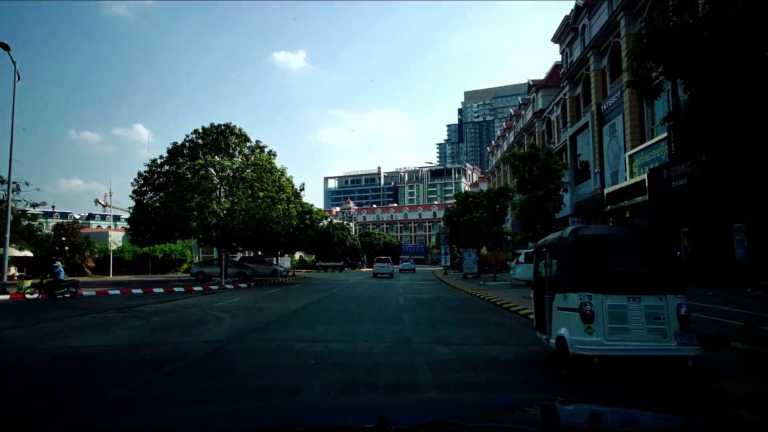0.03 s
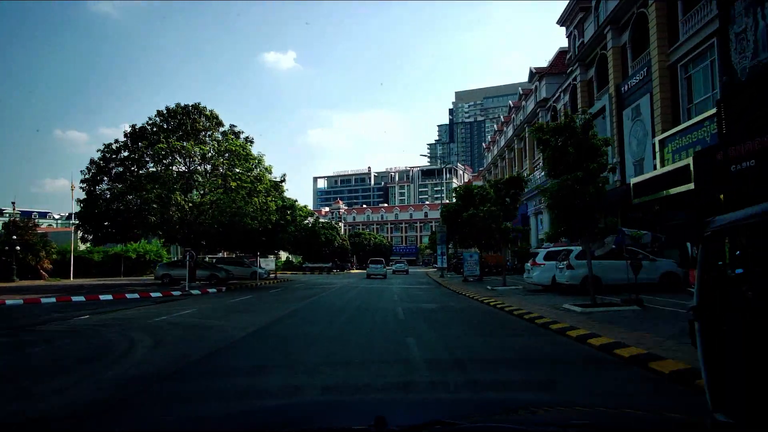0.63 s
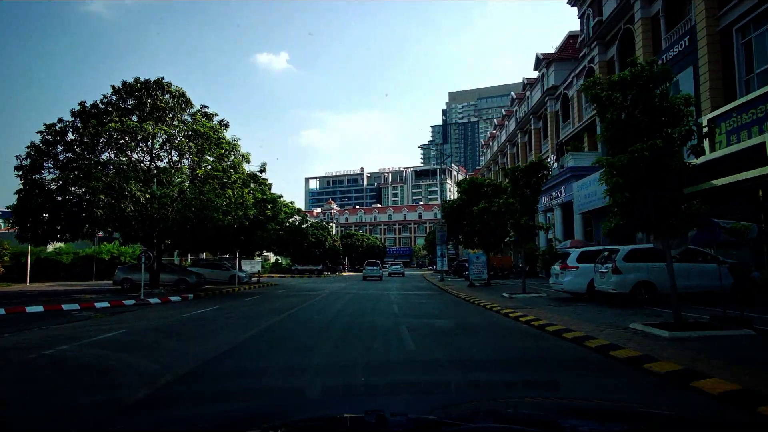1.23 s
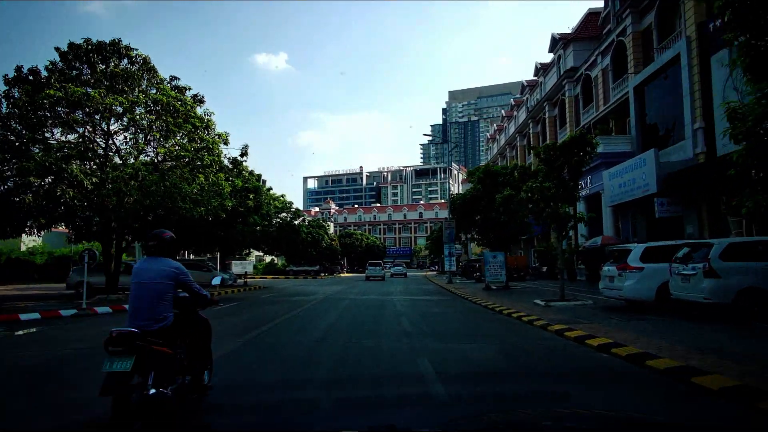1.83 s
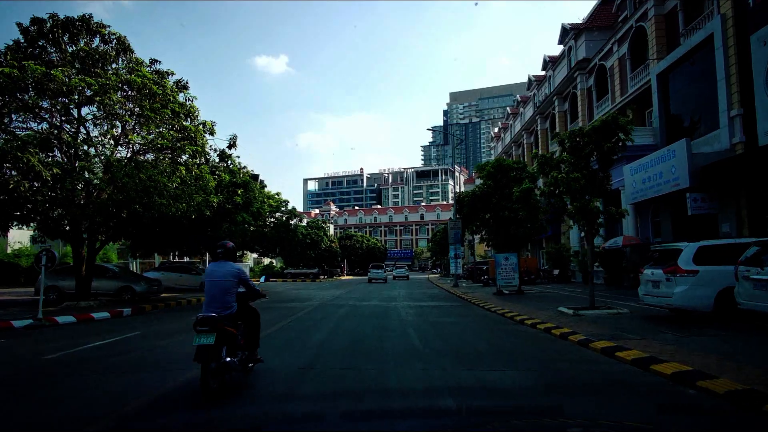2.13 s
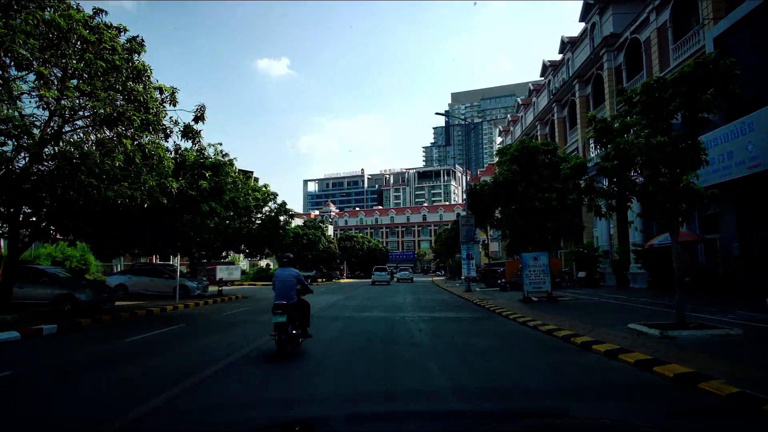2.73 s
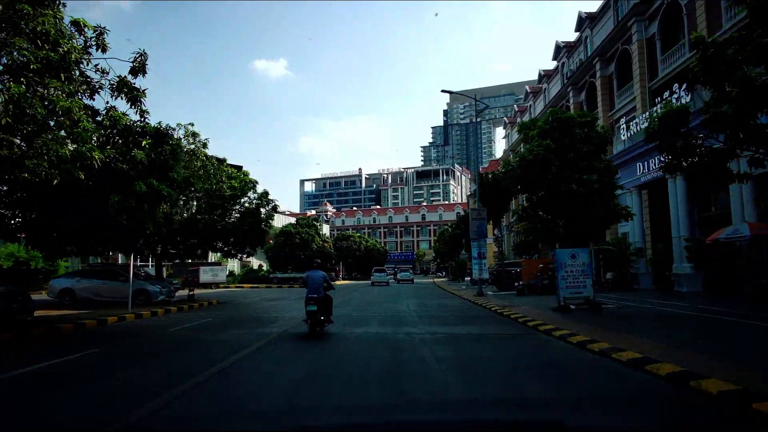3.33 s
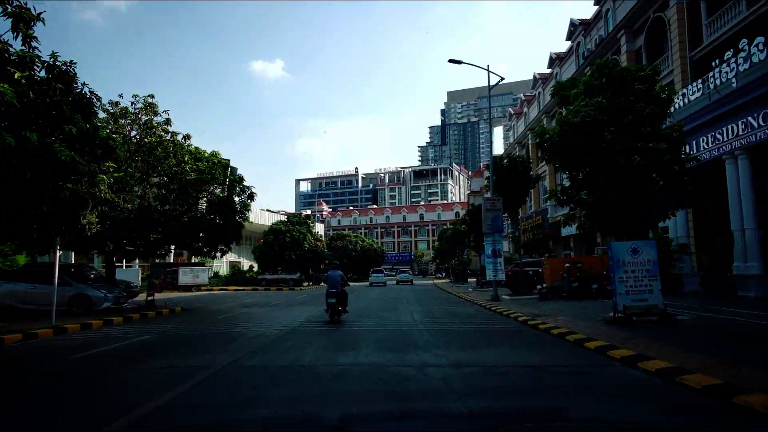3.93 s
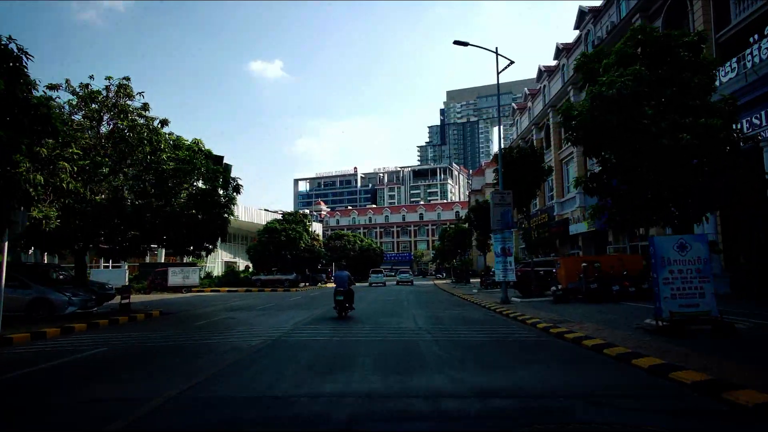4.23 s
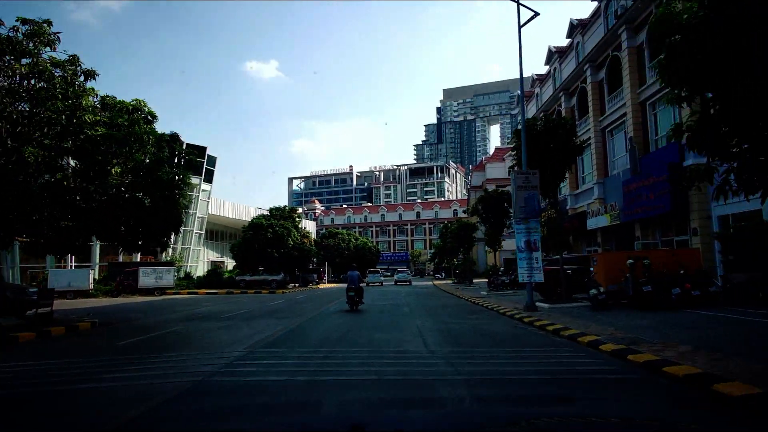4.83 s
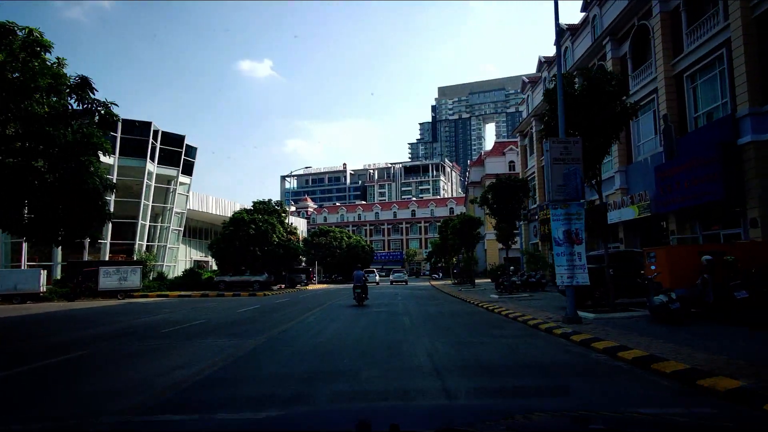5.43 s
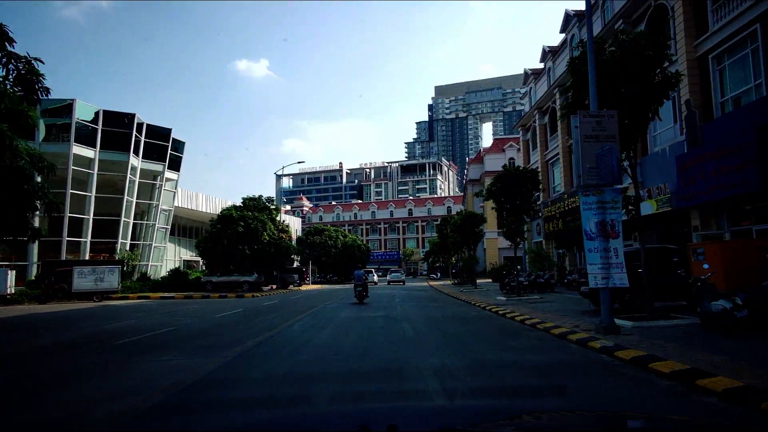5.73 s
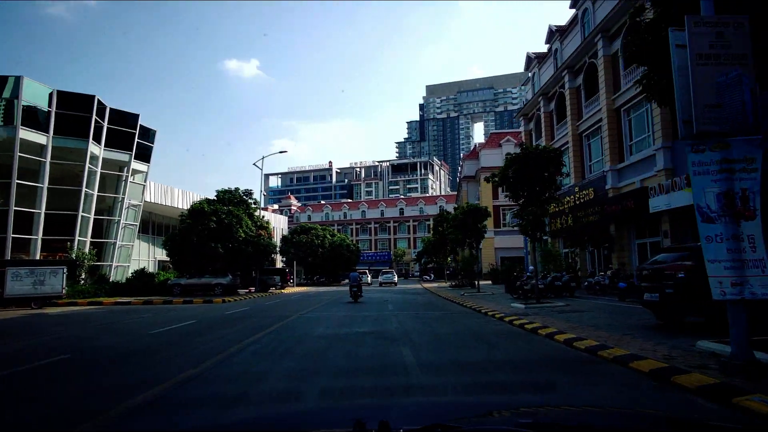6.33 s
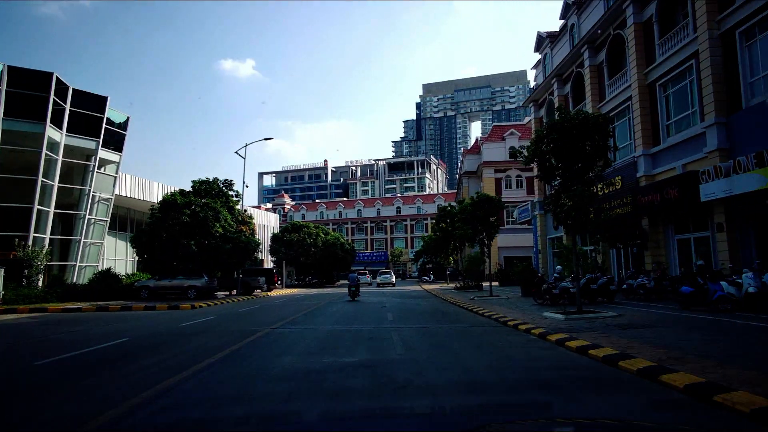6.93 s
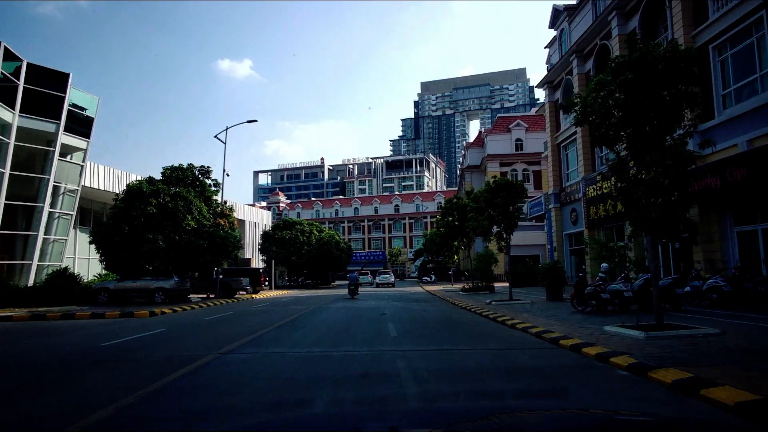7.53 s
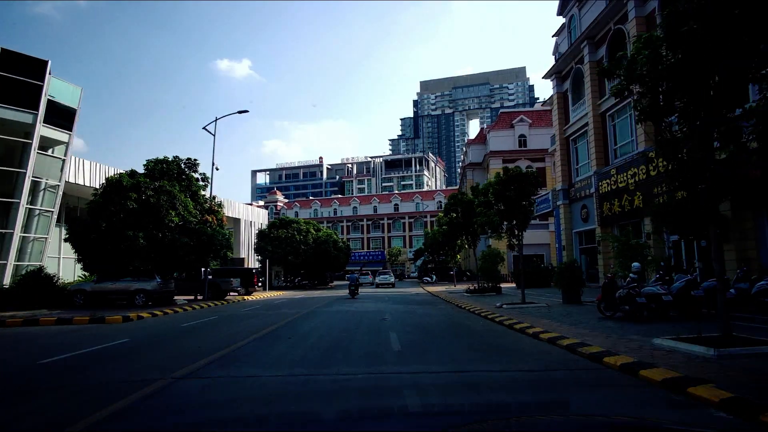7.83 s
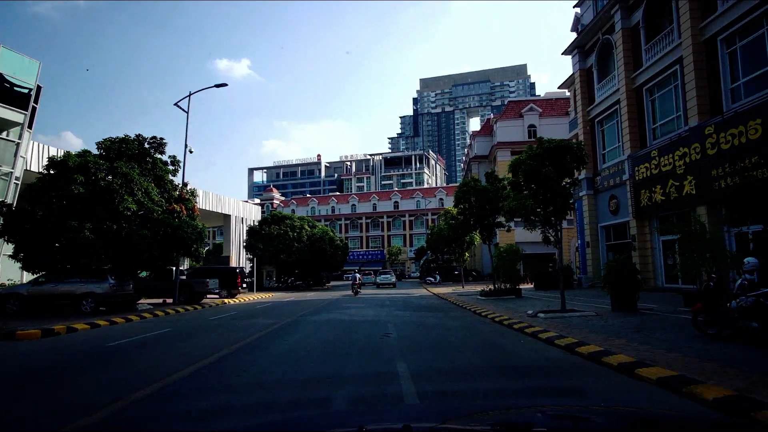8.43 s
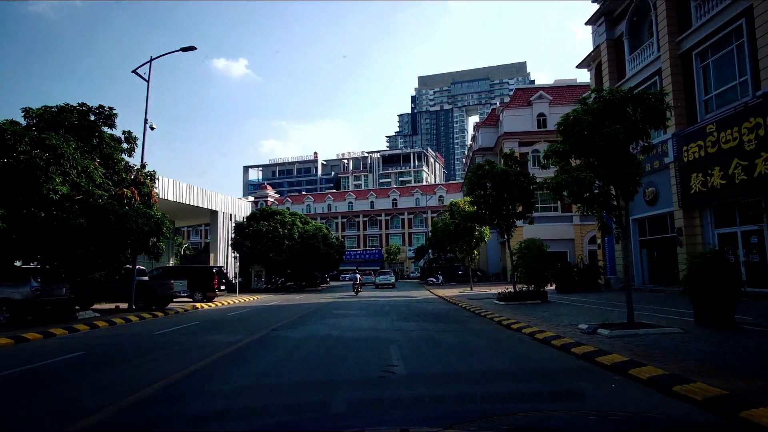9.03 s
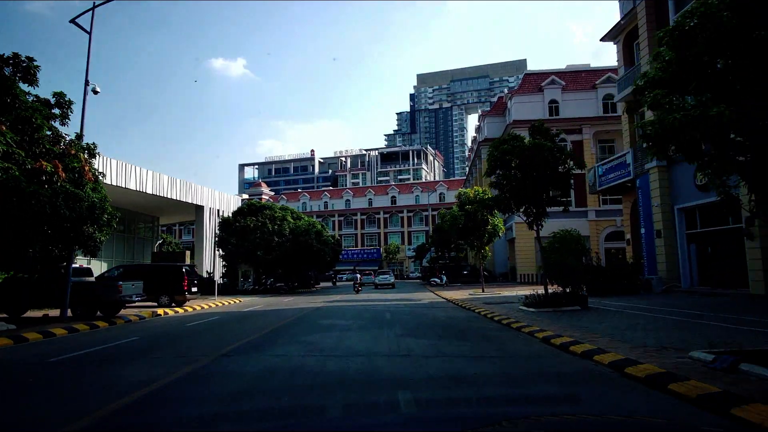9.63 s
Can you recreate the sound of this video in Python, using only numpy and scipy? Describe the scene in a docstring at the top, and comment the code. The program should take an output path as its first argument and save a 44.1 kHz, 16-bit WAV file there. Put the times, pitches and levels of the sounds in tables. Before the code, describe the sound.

A steady low rumble and dull tyre roar fill a car's cabin for the whole stretch, heard from behind the windscreen with the windows closed. Around 1 second a motorbike overtakes slightly to the left, its muffled exhaust drone swelling with the rumble and fading by 2 seconds. Road seams give soft thumps around the same time and a firmer double bump just after 3 seconds, while the plastic trim ticks lightly now and then. From about 5.8 to 6.7 seconds, front and then rear wheels cross raised strips: a rapid run of heavy, deep thuds with a coarse tyre growl, chattering trim, hollow dashboard knocks and a few tiny clinks from a loose part. Even rolling returns, with a light knock near 7.4 seconds and another bump around 9. A very faint street swish, microphone hiss and thin whine sit underneath throughout.

```python
"""Inside a car on a city street, just behind the windscreen, rolling along at an even pace.
The road shakes the cabin into a low rumble under a dull tyre roar. Front wheels, then rear wheels,
thump over some seams and five raised strips; the plastic trim ticks, the dashboard knocks and a small
loose part clinks. A motorbike overtakes on the left, its exhaust droning through the glass.
Behind it all are the swish of the street and a cheap microphone's hiss and thin whine."""
import sys
import numpy as np
from scipy import signal
from scipy.fft import rfft, irfft, next_fast_len
from scipy.io import wavfile
from scipy.ndimage import uniform_filter1d

SR = 44100
rng = np.random.default_rng(int(sys.argv[2]) if len(sys.argv) > 2 else 0)


def wav_record(signal):
    """Record a signal, one row per channel, as 16-bit PCM in the file named by sys.argv[1]."""
    frames = np.transpose(np.atleast_2d(signal))
    bounded = np.clip(frames, -1, 1)
    # unit amplitude maps onto the largest positive 16-bit level
    quanta = np.round(bounded * 32767).astype(np.int16)
    wavfile.write(sys.argv[1], SR, quanta)


N = 427769

# A "mode" is a pitch at which something likes to ring; a narrow one rings for longer.
# cabin air and body panels: f/Hz, width/Hz, level/dB
CABIN_MODES = [(24.4, 14.7, 3.5), (43.5, 14.8, 8), (78.4, 18.3, 1), (128.1, 42.7, -2), (160.2, 46, -13.5),
               (200.6, 24.2, -12), (233.9, 14.5, -11.5), (276.6, 50.5, -14.5), (318.2, 60, -26.5),
               (376.5, 27, -56), (463, 72, -23), (550, 5.7, -39)]
# the tyre's tread: f/Hz, width/Hz, level/dB
TREAD_MODES = [(659, 110, -1.5), (777, 47, 3), (872.6, 75, 1.5), (1072, 52, 2), (1226, 61, -2.5)]
# the tyre's own bounce, woken by sharp edges: f/Hz, width/Hz, level/dB
BOUNCE_MODES = [(86.7, 55, -2.5)]
# the tyre's casing (its tough shell): f/Hz, width/Hz, level/dB
CASING_MODES = [(284, 75, 3.5), (387, 90, 2), (459, 61, -1.5), (540, 41, -6), (632, 43, -4)]
# the roof panel: f/Hz, width/Hz, level/dB
ROOF_MODES = [(104.6, 18, -8.5), (126.2, 15.5, 9.5), (161, 19, -4)]
# the dashboard: f/Hz, width/Hz, level/dB
DASHBOARD_MODES = [(900, 200, 0), (1080, 280, -5)]
# the small loose part: f/Hz, width/Hz, level/dB
LOOSE_PART_MODES = [(2150, 700, 3), (3300, 1300, 1.5), (4700, 900, -4), (6750, 1200, 0), (8050, 1200, 2),
                    (9150, 750, -2), (11450, 1100, -5), (13400, 800, 1), (15000, 1400, -5)]

# A "spectrum" says how strong a noise is from its low to its high pitches.
# tyres on asphalt: f/Hz, level/dB
ROAR_SPECTRUM = [(200, -3.5), (400, 2.5), (560, -10), (720, -0.5), (1000, 2), (1250, 1), (1450, -4.5),
                 (1700, -13), (2400, -14.5), (2900, -21), (4500, -32), (9000, -58)]
# tyres on the coarse paint of the strips: f/Hz, level/dB
GROWL_SPECTRUM = [(150, -20), (330, -2), (560, -0.5), (680, 0.5), (860, 1), (1250, -6.5), (1750, -16),
                  (2250, -18), (2800, -29), (3800, -27), (5000, -37), (7000, -59.5)]
# the street outside: f/Hz, level/dB
SWISH_SPECTRUM = [(900, -43), (1600, 6), (2500, -4.5), (2900, 3), (4100, 5.5), (5000, -4.5), (7000, -7),
                  (12000, -16)]
# the microphone's hiss: f/Hz, level/dB
HISS_SPECTRUM = [(300, -21), (1400, -4.5), (2500, 11), (2900, 3.5), (4000, 0), (5000, 4), (7600, 2),
                 (10000, 2), (12500, 1.5), (14500, 2), (16000, 1)]

# what coarser or smoother asphalt adds to drumming and roar: t/s, level/dB
ROAD_COARSENESS = [(0, 0.5), (1.5, 1.5), (2.6, -1.2), (5.0, 0.5), (7.0, 0.3), (8.2, -0.9), (9.5, 0.5)]
# shallow hollows that load the tyres and make the cabin boom: t/s, level/dB
ROAD_HOLLOWS = [(0.79, -29.5), (1.67, -29), (2.28, -34), (2.51, -27.5), (2.99, -27.5), (3.28, -20),
                (3.68, -21.5), (4.79, -30), (5.15, -20.5), (5.36, -27.5), (6.77, -22), (7.08, -22.5),
                (7.85, -26.5), (8.15, -27.5), (8.93, -19.5), (9.35, -19.5), (9.66, -27.5)]
# seams and dents in the road: t/s, front jolt/dB, rear jolt compared with front/dB, roof hum/dB
ROAD_SEAMS = [(0.76, -18.5, -4, -34), (0.965, -15.5, -12, -25), (3.19, -10.5, -8.5, -12.5),
              (3.275, -22, -22, -19), (4.384, -31, -16, -18.5), (5.095, -20.5, -12, -28),
              (5.745, -29, -20, -20), (6.665, -28, -14, -17), (7.381, -32, -9, -29),
              (8.891, -17.5, -6, -37)]
# one row per raised strip: front jolt/dB, rear jolt/dB, front roof hum/dB, rear roof hum/dB
RAISED_STRIPS = [(-6, -6, -14, -28), (-6, -6.5, -15, -13), (-10, -6.5, -16, -18), (-8, -9, -14, -23),
                 (-8.5, -13, -13.5, -26)]
# ticks of the plastic trim: t/s, ring f/Hz, ring peak/dB, snap peak/dB, top of the snap f/Hz
TRIM_TICKS = [(0.366, 1850, -42, -40, 5800), (0.502, 2550, -56, -46, 4000), (1.014, 2450, -49, -44, 3900),
              (1.197, 2200, -44, -46, 3600), (1.323, 2590, -44, -46, 3500), (1.392, 2350, -38, -37, 5600),
              (1.393, 11650, -41, -51, 14000), (1.603, 2300, -45, -46, 3300), (1.659, 2600, -47, -49, 3500),
              (1.970, 2200, -49, -53, 3000), (2.040, 2500, -41, -50, 3000), (2.172, 2500, -47, -51, 3000),
              (2.958, 2580, -45, -52, 3500), (3.652, 2000, -50, -51, 3500), (3.673, 2200, -46, -46, 3904),
              (3.686, 1750, -46, -51, 4200), (3.703, 2500, -47, -49, 4200), (3.725, 2000, -50, -50, 4000),
              (4.989, 2500, -47, -48, 3500), (5.103, 2500, -45, -49, 3500), (5.146, 2580, -45, -48, 3500),
              (5.840, 2080, -32, -50, 3000), (5.858, 2620, -35, -47, 3500), (5.950, 2650, -36, -39, 4000),
              (6.036, 2400, -33.5, -33.5, 4000), (6.121, 2500, -33, -37, 4200),
              (6.154, 3200, -38, -40, 4800), (6.170, 2400, -37, -33, 4800), (6.203, 2200, -39, -44, 3500),
              (6.280, 4400, -43, -40, 5800), (6.336, 3100, -34, -36, 4200), (6.346, 2140, -36, -38, 4800),
              (6.627, 2300, -41, -45, 3500), (6.794, 2400, -49, -50, 3500), (6.999, 2540, -42, -53, 3000),
              (7.033, 2580, -46, -53, 3000), (7.113, 2400, -44, -53, 3000), (7.738, 2300, -49, -51, 8000),
              (9.319, 2390, -44, -50, 5500), (9.391, 2150, -45, -46, 5800), (9.481, 2500, -51, -48, 3500)]
# hollow knocks in the dashboard: t/s, level/dB
DASHBOARD_KNOCKS = [(0.935, -35.5), (3.612, -41.5), (3.672, -42), (5.849, -35.5), (5.95, -37),
                    (6.12, -29.5), (6.358, -35), (6.448, -29.5), (6.468, -35), (6.537, -28.5), (6.561, -35),
                    (6.644, -32), (7.388, -31), (7.57, -39)]
# landings of the loose part: t/s, level/dB
LOOSE_PART_LANDINGS = [(6.151, -40.5), (6.241, -36.5), (6.333, -35.5), (6.413, -47)]
# the motorbike as it draws level and pulls ahead: t/s, level/dB
MOTORBIKE_LEVEL = [(0, -34), (0.95, -35.5), (1.02, -17.5), (1.12, -25.5), (1.25, -17.5), (1.4, -27.5),
                   (1.8, -50), (2.6, -68)]
# the tones of its exhaust, heard through the glass: multiple of the firing rate, level/dB
EXHAUST_TONES = [(3, -24), (4, -1), (5, 1), (6, -6), (7, -14.5), (8, -20), (9, -34)]
# swish of the street, strongest while other traffic is close: t/s, level/dB
STREET_LEVEL = [(0, -64), (1.2, -61.5), (2.0, -66), (3.0, -67), (4.0, -66.5), (7.0, -65), (8.2, -66),
                (9.4, -65)]
# electrical whine: f/Hz, level/dB, phase between left and right/rad
WHINE_TONES = [(3000, -76.5, 1.5), (6000, -75.3, 1.5), (12000, -78.5, 1.3), (15000, -76, 3.1)]

AXLE_LAG_S, WHEEL_LAG_S = .445, .02086  # rear wheels after front ones; one side after the other
STRIP_TIMES_S = 5.815 + .089 * np.arange(len(RAISED_STRIPS))  # the front wheels meet each strip
STRIP_SIDE_DB = -14.5  # stereo width of the strips' noises (see white)


def road_levels():
    """Levels in dB of boom, drumming and roar: they follow the asphalt and swell in every hollow."""
    hollow_spread_s = .051
    hollows = [from_db(db) * np.exp(-((seconds() - s) / hollow_spread_s) ** 2 / 2)
               for s, db in ROAD_HOLLOWS]
    swell = np.linalg.norm(hollows, axis=0)
    texture_db = in_time(ROAD_COARSENESS) + .19 * drift(hz=4.5)
    boom = np.hypot(from_db(-30.5 + .5 * drift(hz=6.5)), swell)  # hypot adds unrelated noise levels
    drum = np.hypot(from_db(-28 + texture_db), from_db(-10.5) * swell)
    roar = np.hypot(from_db(-49 + texture_db), from_db(-29.5) * swell)
    return 20 * np.log10([boom, drum, roar])


def cabin_rumble(boom_db, drum_db):
    """Long waves in the asphalt make the cabin boom; its coarse grain drums on the panels."""
    shake = resonate(white(side_db=-36), CABIN_MODES)
    sway = resonate(white(side_db=-21), CABIN_MODES)
    boom = from_db(boom_db) * rms_one(cut(sway, 90, "low", order=4))
    drum = from_db(drum_db) * rms_one(cut(shake, 93.5, "high", order=4))
    return panned(boom, left_db=.8) + panned(drum, left_db=.25)


def tyre_roar(roar_db):
    """The rolling tread roars and rings, dulled by the closed windows."""
    ringing = rms_one(resonate(white(side_db=-57), TREAD_MODES))
    roar = coloured(ROAR_SPECTRUM, side_db=-46)
    return from_db(roar_db) * (roar + from_db(-1.5) * ringing)


def jolts(times, db, shudder_db, shudder_s, side_db):
    """Two wheels hit a moment apart, cushioned by their tyres; the suspension shudders on."""
    hits = blows(times, db) + blows(times + WHEEL_LAG_S, db - 6)
    kicks = cut(hits + 1e-18, 276, "low")  # the tiny offset keeps the filter fast in silence
    shudder = from_db(shudder_db) * bursts(times, db, rise_s=.0087, decay_s=shudder_s)
    return kicks + shudder * white(side_db)


def seam_jolts():
    """Each seam kicks the front wheels, then the rear ones."""
    front_s, front_db, rear_change_db, _ = np.transpose(ROAD_SEAMS)
    times = np.r_[front_s, front_s + AXLE_LAG_S]
    db = np.r_[front_db, front_db + rear_change_db]
    force = jolts(times, db, shudder_db=-30, shudder_s=.056, side_db=-34)
    softened = cut(force, 324, "low", order=1)
    return cut(softened, 50, "high", order=1)


def strip_jolts():
    """The strips give heavy, deep thumps; the far-off rear wheels sound duller."""
    front_db, rear_db, _, _ = np.transpose(RAISED_STRIPS)
    front_s, rear_s = STRIP_TIMES_S + .0041, STRIP_TIMES_S + AXLE_LAG_S
    front = jolts(front_s, front_db, shudder_db=-31, shudder_s=.051, side_db=STRIP_SIDE_DB)
    rear = jolts(rear_s, rear_db, shudder_db=-31, shudder_s=.049, side_db=STRIP_SIDE_DB)
    force = cut(front, 424, "low", order=1) + cut(rear, 160, "low", order=1)
    return panned(cut(force, 30, "high", order=1), left_db=.7)


def thumps():
    """The cabin and the tyres ring with every jolt."""
    return strike(seam_jolts() + strip_jolts(), CABIN_MODES + BOUNCE_MODES)


def roof_hum():
    """Sharp edges in the road set the large roof panel humming for a moment."""
    seam_s, _, _, seam_db = np.transpose(ROAD_SEAMS)
    _, _, front_db, rear_db = np.transpose(RAISED_STRIPS)
    strip_s = STRIP_TIMES_S + .005  # the roof answers a little late
    force = blows(seam_s + WHEEL_LAG_S, seam_db)
    force += blows(strip_s, front_db) + blows(strip_s + AXLE_LAG_S, rear_db)
    return strike(force + 1e-18, ROOF_MODES)


def tyre_thuds():
    """The tyre's casing rings briefly as it hits each strip."""
    front = bursts(STRIP_TIMES_S, db=-28.5, rise_s=.015, decay_s=.021)
    rear = bursts(STRIP_TIMES_S + AXLE_LAG_S, db=-37.5, rise_s=.015, decay_s=.021)
    return (front + rear) * rms_one(resonate(white(STRIP_SIDE_DB), CASING_MODES))


def paint_growl():
    """The tread grinds over the paint and slaps harder as it drops off each strip."""
    attack_s, hold_s, release_s = .046, .023, .016
    t = seconds()
    front_s, rear_s = STRIP_TIMES_S, STRIP_TIMES_S + AXLE_LAG_S
    fade_in = np.clip((t - front_s[0]) / attack_s + 1, 0, 2) / 2
    fade_out = np.exp(-np.maximum(t - rear_s[-1] - hold_s, 0) / release_s)
    paint_db = np.interp(t, [front_s[0], rear_s[-1]], [-33.5, -36])
    grinding = fade_in * fade_out * from_db(paint_db)
    slaps = bursts(np.r_[front_s, rear_s] + WHEEL_LAG_S, db=0, rise_s=.006, decay_s=.018)
    grit = from_db(1.7 * drift(hz=90))
    return grinding * (.85 + .2 * slaps) * grit * coloured(GROWL_SPECTRUM, STRIP_SIDE_DB)


def motorbike(firings_per_s=28.4):
    """One cylinder fires a little unevenly; only the low tones of its exhaust get into the cabin."""
    firing_hz = firings_per_s * (1 + .015 * drift(hz=6))
    phase = 2 * np.pi * np.cumsum(firing_hz) / SR
    note = 0
    for multiple, db in EXHAUST_TONES:
        strength = from_db(db + .69 * drift(hz=7.3))
        note += strength * np.sin(multiple * phase + rng.uniform(0, 2 * np.pi))
    return panned(from_db(in_time(MOTORBIKE_LEVEL)) * rms_one(note), left_db=1.8)


def trim_chatter(count=26):
    """The strips shake extra ticks out of the trim at random; rows are laid out like TRIM_TICKS."""
    span_s = STRIP_TIMES_S[-1] + AXLE_LAG_S - STRIP_TIMES_S[0]
    when, size, pitch = rng.random((count, 3)).T
    times = STRIP_TIMES_S[0] + span_s * when
    ring_db = -49.5 + 3 * (2 * size - 1) + 4.5 * np.sin(np.pi * when)  # loudest halfway across
    ring_hz = 1600 * 2 ** pitch
    snap_db, top_hz = ring_db + 1.5, np.full(count, 4200)
    return np.c_[times, ring_hz, ring_db, snap_db, top_hz]


def trim_ticks(snap_s=.0022, echo_s=.01):
    """A joint in the trim snaps, and its plastic panel rings on for a moment."""
    age = seconds()[:SR // 12]
    fade = np.exp(-age / snap_s) + from_db(-17) * np.exp(-age / echo_s)
    out = np.zeros((2, N + SR))
    for s, ring_hz, ring_db, snap_db, top_hz in np.vstack([TRIM_TICKS, trim_chatter()]):
        mid, side = rng.standard_normal((2, len(age)))
        slip = fade * stereo(mid, side, side_db=-4)
        ring = resonate(slip, [(ring_hz, .3 * ring_hz, 0)])
        snap = cut(cut(slip, 1880, "high"), top_hz, "low", order=6)
        tick = from_db(ring_db) * ring / np.abs(ring).max()
        tick += from_db(snap_db) * snap / np.abs(snap).max()
        start = int(s * SR)
        out[:, start:start + len(age)] += tick
    return out[:, :N]


def rattle(hits, modes, rise_s, decay_s, echo_db, echo_s, side_db):
    """Two parts chatter against each other for an instant; the cabin adds a short echo."""
    times, db = np.transpose(hits)
    contact = bursts(times, db, rise_s, decay_s)
    echo = bursts(times, db + echo_db, rise_s=.0049, decay_s=echo_s)
    return (contact + echo) * rms_one(resonate(white(side_db), modes))


def loose_part_clinks():
    """A small hard part jumps, lands and bounces once more after each landing."""
    bounces = np.add(LOOSE_PART_LANDINGS, [.009, -11])  # later/s, softer/dB
    clinks = rattle(np.vstack([LOOSE_PART_LANDINGS, bounces]), LOOSE_PART_MODES,
                    rise_s=.0015, decay_s=.0016, echo_db=-13, echo_s=.016, side_db=1)
    return panned(clinks, left_db=4)


def dashboard_knocks():
    """The shaken dashboard gives dull, hollow knocks."""
    knocks = rattle(DASHBOARD_KNOCKS, DASHBOARD_MODES,
                    rise_s=.003, decay_s=.009, echo_db=-20, echo_s=.02, side_db=-26)
    return cut(knocks, 1300, "low", order=4)


def street_swish():
    """Traffic outside makes a faint swish, mostly on the left."""
    swish = coloured(SWISH_SPECTRUM, side_db=-1.5)
    return panned(from_db(in_time(STREET_LEVEL)) * swish, left_db=5)


def microphone_noise():
    """The microphone's electronics add a wide hiss and a steady, thin whine."""
    whine = 0
    for hz, db, right_phase in WHINE_TONES:
        phase = 2 * np.pi * hz * seconds() + np.array([[0], [right_phase]])
        whine += from_db(db) * np.sqrt(2) * np.sin(phase)
    return whine + from_db(-58.5) * coloured(HISS_SPECTRUM, side_db=1.5)


def from_db(db):
    """Turn decibels into a number to multiply by."""
    return 10 ** (np.asarray(db) / 20)


def rms_one(x):
    """Scale a sound so that its average strength (rms) is 1."""
    return x / np.sqrt(np.mean(x ** 2) + 1e-20)


def seconds():
    """The time of every sample."""
    return np.arange(N) / SR


def in_time(rows):
    """Join (time, value) points with straight lines."""
    return np.interp(seconds(), *np.transpose(rows))


def cut(x, hz, kind, order=2):
    """Keep what lies below ("low") or above ("high") hz."""
    return signal.sosfilt(signal.butter(order, hz, kind, fs=SR, output="sos"), x)


def panned(x, left_db):
    """Make the left louder than the right by left_db."""
    return x * from_db(left_db * np.array([[.5], [-.5]]))


def stereo(mid, side, side_db):
    """Both ears get mid; side is added on the left and taken away on the right."""
    return mid + from_db(side_db) * side * np.array([[1], [-1]])


def white(side_db):
    """Even stereo noise; at side_db 0 left and right are unrelated, far below 0 nearly the same."""
    mid, side = rng.standard_normal((2, N))
    return rms_one(stereo(mid, side, side_db))


def coloured(spectrum, side_db):
    """Steady stereo noise shaped by a spectrum."""
    hz, db = np.transpose(spectrum)
    size = next_fast_len(N)
    bins_hz = np.linspace(1, SR / 2, size // 2 + 1)
    gain = from_db(np.interp(np.log(bins_hz), np.log(hz), db))
    shaped = irfft(rfft(white(side_db), size) * gain, size)
    return rms_one(shaped[:, :N])


def drift(hz):
    """A random wobble of typical size 1; a higher hz makes it quicker."""
    return rms_one(cut(rng.standard_normal(N), hz, "low"))


def resonate(force, modes):
    """Let a force ring each mode; filtering twice keeps the sound close to that pitch."""
    out = 0
    for hz, width_hz, db in modes:
        r = np.exp(-np.pi * width_hz / SR)  # share of the ring left after one sample
        gain = (1 - r * r) / 2
        section = [gain, 0, -gain, 1, -2 * r * np.cos(2 * np.pi * hz / SR), r * r]
        out = out + from_db(db) * signal.sosfilt([section, section], force)
    return out


def strike(force, modes):
    """Ring the modes, scaled so that a click of size 1 peaks at 1."""
    click_answer = resonate(signal.unit_impulse(SR // 4), modes)
    return resonate(force, modes) / np.abs(click_answer).max()


def blows(times, db):
    """One click per blow."""
    out = np.zeros(N)
    samples = np.round(np.asarray(times) * SR).astype(int)
    out[np.clip(samples, 0, N - 1)] = from_db(db)
    return out


def bursts(times, db, rise_s, decay_s):
    """A loudness curve that swells and dies away after each blow."""
    age = seconds()[:SR // 2]
    shape = (1 - np.exp(-(age / rise_s) ** 2)) * np.exp(-age / decay_s)
    return signal.fftconvolve(blows(times, db), shape / shape.max())[:N]


def scene():
    """Add up the car's own noises, the traffic outside and the microphone's noise."""
    boom_db, drum_db, roar_db = road_levels()
    pass_s, pass_half_s = 1.12, .51  # the boom swells while the motorbike is close
    nearness = 1 / (1 + ((seconds() - pass_s) / pass_half_s) ** 2)
    street = street_swish()
    rolling = cabin_rumble(boom_db + 6.5 * nearness, drum_db) + tyre_roar(roar_db)
    bumps = thumps() + roof_hum() + tyre_thuds() + paint_growl()
    rattles = loose_part_clinks() + dashboard_knocks() + trim_ticks()
    return rolling + bumps + rattles + motorbike() + street + microphone_noise()


def gain_control(x, threshold_db, slope, release_db_per_s):
    """Loud moments turn the volume down; it creeps back afterwards."""
    power = uniform_filter1d(np.mean(x ** 2, axis=0), size=1024)
    level_db = 10 * np.log10(np.maximum(power, 1e-12))
    fall_db = release_db_per_s * seconds()
    held_db = np.maximum.accumulate(level_db + fall_db) - fall_db
    return x * from_db(-slope * np.maximum(held_db - threshold_db, 0))


def record(dry):
    """Cut the deepest bass, gently even out the volume, then cut the highest treble."""
    levelled = gain_control(cut(dry, 5.5, "high"), threshold_db=-15, slope=.45, release_db_per_s=44)
    treble_cut = signal.ellip(12, .1, 80, 15650, fs=SR, output="sos")
    return signal.sosfilt(treble_cut, levelled)


dry = scene()
out = record(dry)
wav_record(out)
```